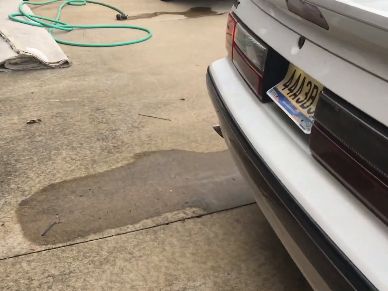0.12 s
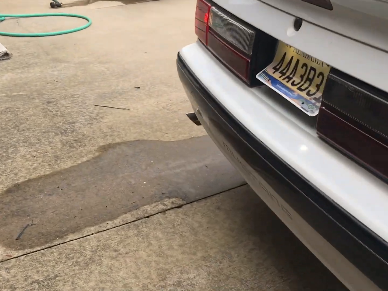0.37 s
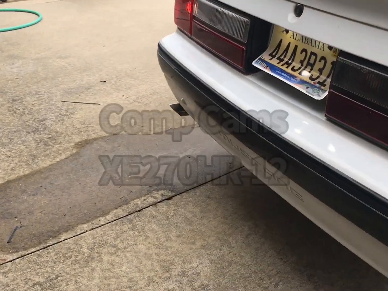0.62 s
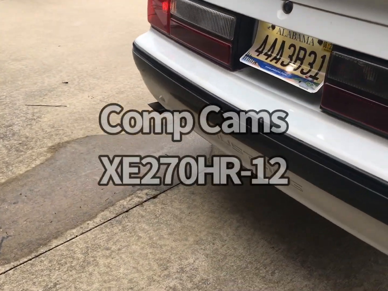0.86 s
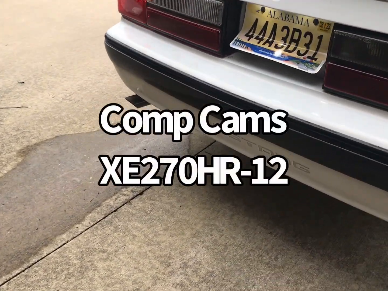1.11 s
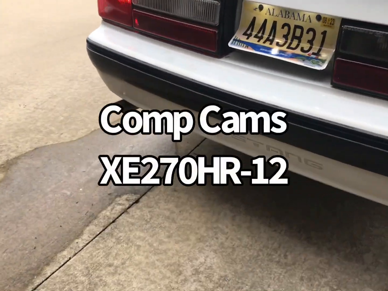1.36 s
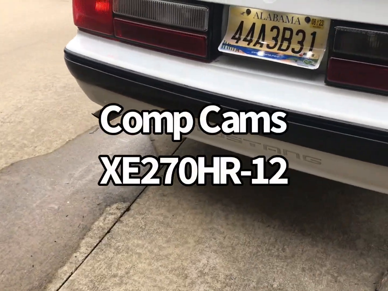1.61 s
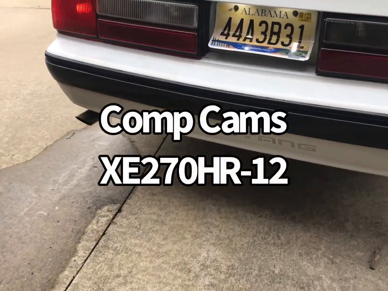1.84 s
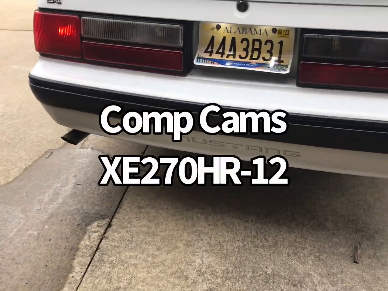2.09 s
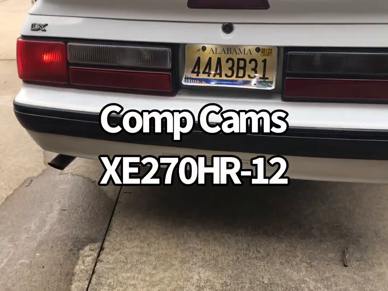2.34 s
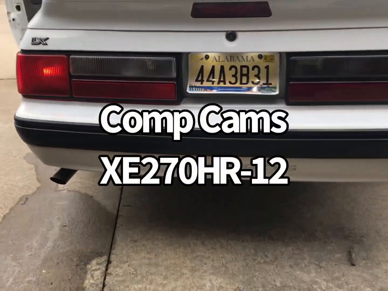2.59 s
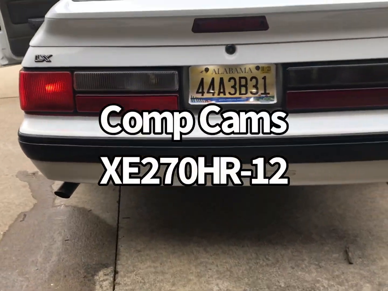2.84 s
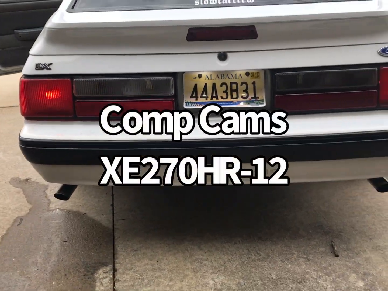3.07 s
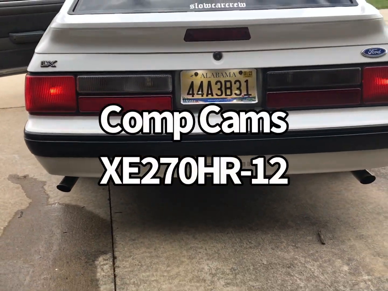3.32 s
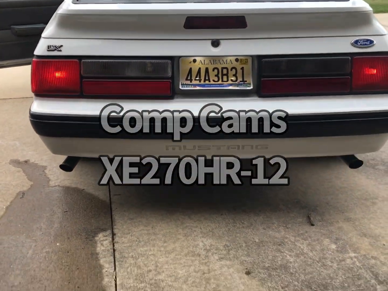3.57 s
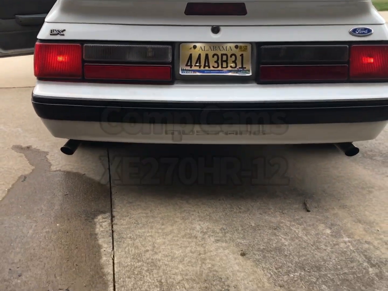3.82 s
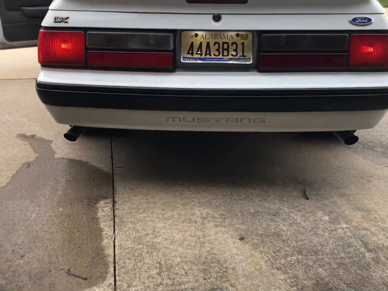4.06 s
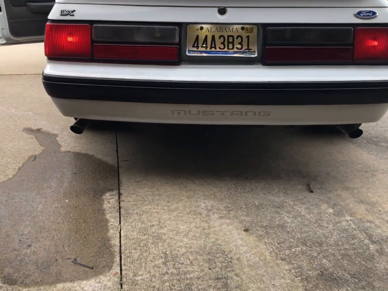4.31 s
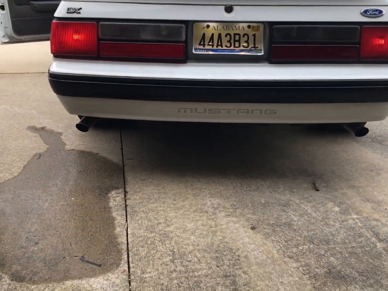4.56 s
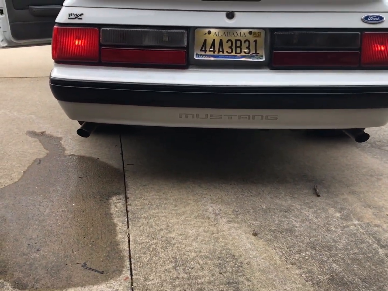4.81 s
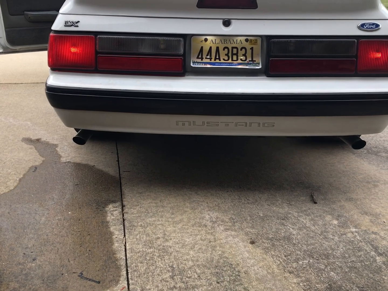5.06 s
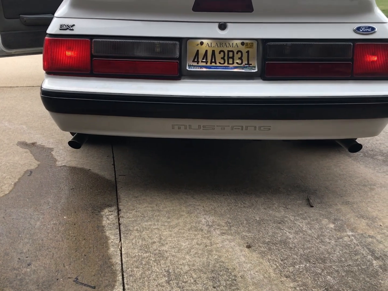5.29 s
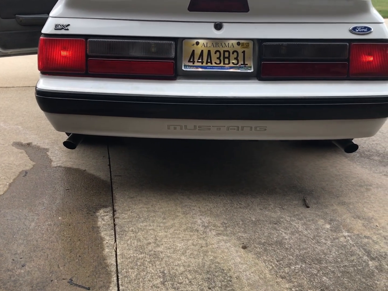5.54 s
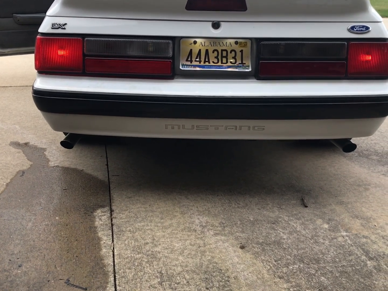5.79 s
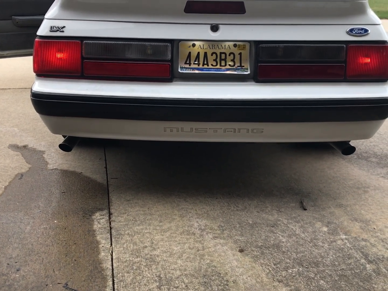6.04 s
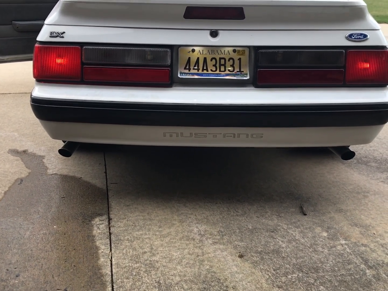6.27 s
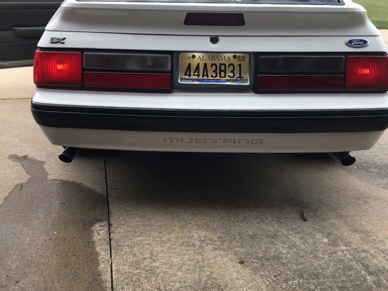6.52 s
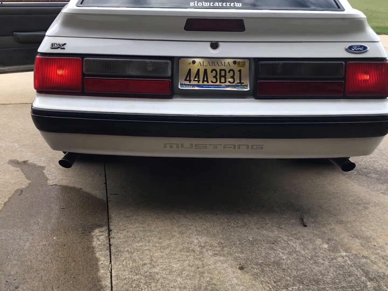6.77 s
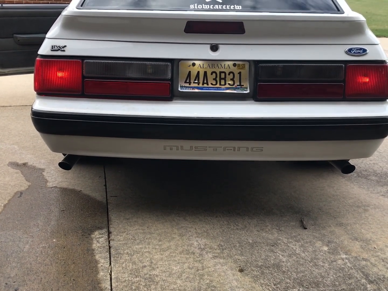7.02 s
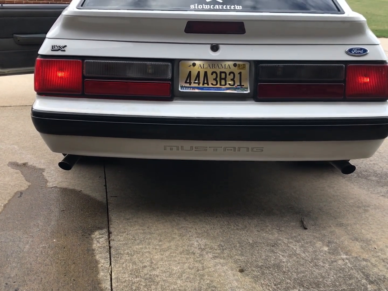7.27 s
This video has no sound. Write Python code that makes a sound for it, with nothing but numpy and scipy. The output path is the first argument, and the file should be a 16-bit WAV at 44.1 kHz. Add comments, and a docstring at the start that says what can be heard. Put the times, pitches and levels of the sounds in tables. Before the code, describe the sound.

Outdoors on concrete, close behind a car, a big V8 idles with a rough, loping burble and irregular airy spits from its tailpipes. Around four seconds the throttle is blipped: a hard bark and roar rises fast, then sinks over a second to a smoother idle. A second blip with metallic pings climbs at the very end and cuts off.

```python
"""A lumpy V8 idles through twin tailpipes over concrete and its throttle is blipped twice.
Even firings sum to harmonic tones, uneven burning rings the pipe modes, and every firing jets gas from a tip.
Under load the tailpipes bark; a steel tip pings faintly at idle and harder in the second blip.
Fan, belts and intake hiss behind, with a tick and squeaks; a ground echo combs rumble, gas and hiss
as the listener walks from the left pipe to the middle behind the car."""
import sys
import numpy as np
from scipy import signal
from scipy.fft import rfft, irfft, next_fast_len
from scipy.io import wavfile
from scipy.ndimage import uniform_filter1d

SR = 44100
rng = np.random.default_rng(int(sys.argv[2]) if len(sys.argv) > 2 else 0)


def store_wav(level_fs):
    """Save 16-bit WAV to argv[1]."""
    pcm = np.round(np.clip(np.atleast_2d(level_fs), -1, 1) * 32767)
    wavfile.write(sys.argv[1], SR, pcm.T.astype(np.int16))


def attenuation_scalar(level_db):
    """Turn a level in dB into a linear amplitude multiplier (20 dB per decade)."""
    decades = np.asarray(level_db, float) / 20
    return 10 ** decades


N = 325796
t = np.arange(N) / SR
# the hardest jets of gas: (time [s], relative peak level [dB])
SPITS = [(0.166, -16), (0.206, -16.5), (0.425, -19), (0.484, -22), (0.7, -16), (0.795, -13), (0.835, -13),
         (0.932, -15), (1.042, -17), (1.097, -11.5), (1.139, -16), (1.236, -14), (1.273, -14.5),
         (1.347, -16.5), (1.405, -17), (1.445, -17), (1.649, -21), (1.821, -14), (1.933, -10.5),
         (2.01, -29), (2.061, -15.5), (2.117, -22), (2.404, -13.5), (2.474, -14.5), (2.529, -14.5),
         (2.58, -21), (2.689, -17.5), (2.757, -16), (2.866, -16.5), (2.969, -14), (3.433, -16.5),
         (3.933, -16), (3.96, -4.5), (4.0145, 1), (4.086, -7), (4.4974, -27), (4.8918, -16), (6.2724, -19),
         (7.135, -12), (7.155, -5), (7.2104, -6.5)]
# random spread of jet strength and of firing knocks [dB]; wavering of octave and undertone [dB]
JET_SCATTER_DB, WAVER_DB = 1.5, 2.5
# the thump in the pipe is under way this long before its jet is heard [s]
THUMP_LEAD_S = 0.0075


def unit(x):
    """Normalisation to unit rms."""
    return x / np.sqrt(np.mean(x ** 2))


def curves(table, x=t):
    """Linear interpolation of each later column of a table against its first."""
    first, *columns = np.transpose(table)
    return [np.interp(x, first, c) for c in columns]


def colour(x, points):
    """Linear-phase filtering: the spectrum is multiplied by a gain through (frequency [Hz], gain [dB]) points."""
    hz, db = np.transpose(points)
    size = next_fast_len(N)
    f = np.arange(size // 2 + 1) * SR / size + 1
    gain = attenuation_scalar(np.interp(np.log(f), np.log(hz), db))
    return irfft(rfft(x, size) * gain, size)[:N]


def band(x, lo_hz, hi_hz, order):
    """Butterworth band-pass filtering."""
    return signal.sosfilt(signal.butter(order, [lo_hz, hi_hz], "band", fs=SR, output="sos"), x)


def band_level(x, lo_hz, hi_hz):
    """Normalisation of the whole signal by the rms of one band."""
    return x / np.sqrt(np.mean(band(x, lo_hz, hi_hz, 4) ** 2))


def decay(x, seconds):
    """Exponential relaxation: a one-pole tail with peak 1 for a unit click."""
    return signal.lfilter([1], [1, -np.exp(-1 / (seconds * SR))], x)


def walk(rate):
    """Slow random modulation: levels held for 1 / rate seconds and slewed, with unit rms."""
    k = int(SR / rate)
    return unit(uniform_filter1d(np.repeat(rng.standard_normal(N // k + 1), k), k)[:N])


def clicks(times, sizes):
    """An impulse train of single-sample clicks."""
    x = np.zeros(N)
    np.add.at(x, np.clip((np.asarray(times) * SR).astype(int), 0, N - 1), sizes)
    return x


def small_sounds():
    """Transients: a dry tick of decaying, differentiated noise, and squeaks that are brief sine bursts."""
    # small dry ticks: (time [s], relative level [dB])
    ticks = [(3.1339, -30)]
    # thin squeaks: (start [s], length [s], frequency [Hz], peak level [dB])
    squeaks = [(7.012, .036, 7800, -43), (7.04, .035, 7800, -51), (1.66, .03, 14500, -58)]
    s, db = np.transpose(ticks)
    grit = np.diff(rng.standard_normal(N + 3), 3) / 4
    out = decay(clicks(s, attenuation_scalar(db + 11.0)), 0.00045) * grit
    for start, length, hz, db in squeaks:
        shape = np.sin(np.pi * np.clip((t - start) / length, 0, 1)) ** 2
        out = out + attenuation_scalar(db) * shape * np.sin(2 * np.pi * hz * t)
    return out


def hiss(wide, swell_db):
    """Broadband turbulence: coloured noise of fan, belts and intake, flickering and swelling with the throttle."""
    # spectrum of the hiss: (frequency [Hz], relative level [dB])
    hiss_colour = [(150, 35), (300, 33), (600, 25), (1300, 16.5), (2500, 14.5), (3500, 9.5), (4500, 6),
                   (7000, 4), (10000, -1), (11000, -5), (13000, -2), (15500, -12)]
    noise = band_level(colour(rng.standard_normal(N), hiss_colour), 5780, 16200)
    # 18.5 dB more at full opening; the hiss takes a share of the gas swells
    hiss_db = -55 + 18.5 * wide + 0.84 * swell_db
    return noise * attenuation_scalar(hiss_db + 1.63 * walk(25.))


def ground(x, lag_ms, share):
    """Comb filtering: the concrete returns a later, duller copy, so the notches move as the lag changes."""
    late = np.interp(t - lag_ms / 1000, t, x)
    echo = signal.sosfilt(signal.butter(1, 6000, fs=SR, output="sos"), late)
    return x + share * echo


def pings():
    """Impulse response of a damped resonator: a hard jet strikes the steel tip and it rings for milliseconds."""
    # strikes on the tip: (time [s], relative level [dB])
    strikes = [(6.15, -33), (6.275, -38), (6.415, -30.5), (6.971, -29), (7.05, -30), (7.09, -20),
               (7.135, -15.5), (7.169, -20), (7.321, -27)]
    ring_hz, width_hz = 3340, 820
    s, db = np.transpose(strikes)
    mode = signal.iirpeak(ring_hz, ring_hz / width_hz, SR)

    def ring(x):
        """Three equal resonators in cascade."""
        for _ in range(3):
            x = signal.lfilter(*mode, x)
        return x
    return ring(clicks(s, attenuation_scalar(db))) / np.abs(ring(clicks([0], 0.76))).max()


def throttle():
    """Superposition of identical blips, giving the opening 0-1."""
    # throttle blips: (time of widest opening [s], opening [0-1])
    blips = [(3.995, 0.93), (7.144, 0.88)]
    # one blip: (time from widest opening [s], share of its opening [0-1])
    blip_shape = [(-.2, 0.02), (-.1, 0.52), (-.06, 0.77), (0, 1), (.08, 0.74), (0.191, 0.47), (.26, 0.02)]
    after, shape = np.transpose(blip_shape)
    return np.clip(sum(size * np.interp(t - s, after, shape) for s, size in blips), 0, None)


def gas_swells():
    """Amplitude modulation: brief triangular swells of the gas noise [dB]."""
    # swells: (time of peak [s], half length [s], rise [dB])
    swells = [(4.54, 0.14, 6.5), (4.907, 0.1, 2.5), (5.537, 0.32, 3), (6.61, 1, 2.5)]
    return sum(db * np.clip(1 - np.abs(t - s) / half, 0, 1) for s, half, db in swells)


def crank(hz):
    """Phase is the integral of rate: firings counted, eased to bring the hardest jets near whole counts."""
    turns = np.cumsum(hz) / SR
    s = np.transpose(SPITS)[0]
    slip = np.unwrap(np.interp(s, t, turns) % 1, period=1)
    return turns - np.interp(t, s, uniform_filter1d(slip, size=3))


def jet_strengths(beat, first_share, lumpy, luck):
    """Periodic modulation: the lope repeats every sixteen firings, and scatters less as speed rises."""
    # first lope pattern, sixteen firings in turn: (level at idle speed [dB])
    first_lope_db = np.array([-4, 3, 0, 6, -7, 7.5, -7, -8, 6, -8, 5.5, -3, -3, -10, 0, 3.5])
    # second lope pattern: (level at idle speed [dB])
    second_lope_db = np.array([-4, -13, 4, -2, 4, 6, -3, -9, 3, 6, -9, 0, -8, -8, 5, 2])
    lope_db = first_share * first_lope_db[beat] + (1 - first_share) * second_lope_db[beat]
    return attenuation_scalar(lope_db + JET_SCATTER_DB * luck) ** lumpy


def burning(times, count, beat, first_share, luck):
    """Cycle-to-cycle variation: a long-overlap camshaft burns each charge differently."""
    # first lope pattern, share of a full charge burnt by sixteen firings in turn: (share [0-1])
    first_charge = np.array([.1, .65, .35, .35, .95, .55, 0, .45, .65, .4, .7, .1, .9, 0, .4, .75])
    # second lope pattern, where many all but misfire: (share [0-1])
    second_charge = np.array([.15, .15, .95, .05, .65, 1, .2, .1, .7, .9, 0, .9, 0, .25, .7, .55])
    # excess of each cylinder over the mean, in firing order: (relative excess [1])
    cylinders = np.array([1, -1.2, 0.2, 1.32, 0.038, -0.25, -0.72, 1.02])
    # make-up of uneven burning: (time [s], weight of the lope [1], of each cylinder [1], of chance [1])
    burn_shares = [(0, .85, .15, .45), (1.4, .85, .15, .45), (1.8, .95, .05, .3), (3.6, .95, .05, .3),
                   (3.9, .2, .7, .65), (5.4, .2, .75, .6), (5.8, .3, .85, .4), (7.39, .3, .85, .4)]
    charge = first_share * first_charge[beat] + (1 - first_share) * second_charge[beat]
    by_lope, by_cylinder, by_chance = curves(burn_shares, times)
    excess = by_lope * unit(charge - charge.mean())
    excess = excess + by_cylinder * unit(cylinders[count % 8])
    return excess + by_chance * unit(luck)


def spit(times, soft, hard_db, bright_db, gas_db, hz, behind, flow):
    """Jet noise: each firing releases turbulence with a quick rise and a tail that shortens with speed."""
    # jet spectrum beside the left pipe: (frequency [Hz], relative level [dB])
    side_colour = [(350, -106), (560, -5.5), (780, 2.2), (1150, -5), (1500, -6.5), (2200, -12),
                   (3400, -9.5), (4300, -28), (7000, -34), (10000, -45), (15500, -48)]
    # jet spectrum from behind: (frequency [Hz], relative level [dB])
    behind_colour = [(350, -11), (520, -6), (760, -4.5), (1100, -1), (1500, -7), (1950, -6.5), (2300, -8.5),
                     (2650, -11), (2900, -15.5), (3500, -7), (4000, -21), (4700, -16), (5300, -25.5),
                     (7000, -28.5), (10000, -38), (15500, -49)]
    rise_turns, tail_turns = 0.09, 0.32  # time constants in firing periods
    luck_db = 2.5
    last = np.clip(np.searchsorted(times, t) - 1, 1, None)

    def puffs(sizes):
        """Superposed envelopes of the two latest puffs."""
        out = 0
        for k in (last, last - 1):
            age_turns = np.maximum(t - times[k], 0) * hz
            out = out + sizes[k] * (1 - np.exp(-age_turns / rise_turns)) * np.exp(-age_turns / tail_turns)
        return out

    tear = rng.standard_normal(N)
    jet = (1 - behind) * colour(tear, side_colour) + behind * colour(tear, behind_colour)
    # no two jets tear alike: every half octave has its own luck at each firing
    noise = 0
    for centre in 560 * 2 ** np.arange(0, 4, .5):
        luck = luck_db * rng.uniform(-1, 1, 1000)[:len(times)]
        luck = luck + bright_db * np.clip(np.log2(centre / 1100), 0, 1)
        part = band(jet, centre / 2 ** .25, centre * 2 ** .25, 2)
        noise = noise + part * uniform_filter1d(attenuation_scalar(luck)[last], size=40)
    noise = noise + signal.sosfilt(signal.butter(2, 7500, "high", fs=SR, output="sos"), jet)
    # the roar of a jet is dense: compression steadies its loudness from one millisecond to the next
    noise = noise / (uniform_filter1d(noise ** 2, size=150) + 1e-12) ** .3
    noise = band_level(noise, 600, 4000)
    every = puffs(soft)
    every = every / np.sqrt(uniform_filter1d(every ** 2, size=SR // 2) + 1e-12) + flow
    return noise * np.maximum(attenuation_scalar(gas_db - 5.0) * every, puffs(attenuation_scalar(hard_db - 6.0)))


def bark(times, sizes, opening):
    """Forced resonance: with the throttle open, knocks and rushing gas ring the tailpipes briefly."""
    mode_hz, width_hz, full_db = 427, 296, -27.5
    mode = signal.iirpeak(mode_hz, mode_hz / width_hz, SR)
    blows = clicks(times, sizes)
    rush = decay(blows, .003) * rng.standard_normal(N)
    knock = unit(blows) + 0.9 * unit(rush)
    return attenuation_scalar(full_db) * opening * unit(signal.lfilter(*mode, signal.lfilter(*mode, knock)))


def rumble(times, excess, speed, groups_db):
    """Modal excitation: departures from the mean firing, and swirling gas, ring the pipe at its resonances."""
    # pipe modes: (frequency [Hz], width [Hz], relative level at idle speed [dB])
    pipe_modes = [(67.3, 31.6, -1.5), (102.6, 18.4, -1.4), (140.4, 28, 0), (205.4, 22.5, -12.5),
                  (269.6, 12, -9.5), (338.7, 61, -20), (393.5, 24, -14.5), (457, 17, -28.5), (511, 29, -46),
                  (611, 49, -24.5), (702.6, 54, -20), (1068, 5.8, -24.5), (1317, 18.4, -32),
                  (1885, 55, -47)]
    swirl_db = -11.5  # noise against the blows
    tilt_db = 3.5  # per octave of mode frequency and octave of speed
    blows = unit(clicks(times, excess - uniform_filter1d(excess, size=16)))
    blows = blows + attenuation_scalar(swirl_db) * rng.standard_normal(N)
    out = 0
    for k, (hz, width, db) in enumerate(pipe_modes):
        mode = signal.iirpeak(hz, hz / width, SR)
        # twice through each mode keeps the valleys dark
        ringing = signal.lfilter(*mode, signal.lfilter(*mode, blows))
        group_db = (0, *groups_db)[np.searchsorted([170, 300, 450], hz)]
        # speed wakes the upper modes
        mode_db = db + tilt_db * np.log2(hz / pipe_modes[0][0]) * speed + group_db
        # neighbours swing opposite
        out = out + (-1) ** k * attenuation_scalar(mode_db) * ringing
    return unit(out)


def undertone(turns, hz):
    """A subharmonic: the three-quarter order of the firing rate, heard while the revs are above idle."""
    # undertone: (firing rate [Hz], mean rms level [dB])
    undertone_levels = [(65, -48), (85, -34), (110, -33), (135, -31), (148, -51)]
    db = curves(undertone_levels, hz)[0] + WAVER_DB * walk(7.3)
    return np.sqrt(2) * attenuation_scalar(db) * np.cos(3 * np.pi * turns / 2)


def tones(turns, hz, first_db, opening, wide):
    """Fourier synthesis: even firings sum to three orders of the firing rate, shifted in phase by the pipe."""
    # throttle shut: (firing rate [Hz], mean octave rms level [dB], third order relative to octave [dB])
    shut_orders = [(50, -19, -26), (56, -22, -22), (60, -26, -11), (64, -24, -11), (72, -30, -12),
                   (90, -37, -12), (140, -41.5, -8)]
    # the pipe shifts each order, and swells the octave as it crosses the third mode under load: (firing rate [Hz],
    # lead of first order [rad], of second [rad], of third [rad], octave gain at full opening [dB])
    through_pipe = [(50, 1.7, 2.5, 4, 0), (56, 1.7, 2.7, 4.3, 0), (62, 1.7, 4, 5.9, 9),
                    (75, 1.7, 3.4, 5.9, 14), (86, 1.7, 3, 5.9, 3), (100, 1.7, 4.7, 5.9, -4),
                    (140, 1.7, 7.5, 5.9, 0)]
    octave_db, third_db = curves(shut_orders, hz)
    *lead, swell_octave_db = curves(through_pipe, hz)
    # a full opening adds 19 dB to the octave and lowers the third order against it
    second_db = octave_db + (19 + swell_octave_db) * opening
    second_db = second_db + WAVER_DB * (1 - wide) * walk(8.)
    third_db = third_db - 12.5 * opening
    ahead = np.interp(t + THUMP_LEAD_S, t, turns)
    first, second, third = (np.cos(2 * np.pi * (k + 1) * ahead + a) for k, a in enumerate(lead))
    return np.sqrt(2) * (attenuation_scalar(first_db) * first + attenuation_scalar(second_db) * (second + attenuation_scalar(third_db) * third))


def scene():
    """Superposition: one firing sequence over eight cylinders drives every exhaust sound, beside the hiss."""
    # engine: (time [s], firing rate before easing [Hz], firing tone rms level [dB])
    engine = [(0.0, 50.62, -13.5), (0.4, 49.66, -18.5), (1.1, 51.95, -16.5), (1.7, 52.26, -20),
              (2.2, 54.73, -18), (2.9, 56.94, -15.5), (3.35, 55.77, -17), (3.61, 52.08, -18),
              (3.82, 54.76, -13.5), (3.91, 72.47, -9.5), (4.03, 100.8, -6), (4.1, 126.3, -11.5),
              (4.2, 145.1, -9.5), (4.31, 148.1, -18), (4.5, 134.4, -19), (4.72, 115.4, -24.5),
              (4.86, 104.6, -19), (5.12, 90.08, -21), (5.3, 80.61, -24.5), (5.51, 66.8, -20),
              (5.7, 62.7, -15), (6.03, 60.22, -16.5), (6.24, 63.31, -12), (6.5, 65.12, -15),
              (6.8, 64.27, -15.5), (6.89, 61.4, -22), (6.99, 62.88, -12.5), (7.08, 77.53, -9.5),
              (7.15, 94, -5), (7.29, 135.6, -13), (7.39, 143.8, -11.5)]
    # lope and listener: (time [s], share of the first lope pattern [0-1], extra path over the ground [ms],
    # relative pipe rumble [dB], relative gas spit [dB], modes 170-300 Hz [dB], modes 300-450 Hz [dB],
    # modes above 450 Hz [dB], tips heard from behind [0-1])
    lope_and_place = [(0, 0.83, 1.26, -15, -35.5, 9, -9.5, -0.5, 0),
                      (1.0, 0.97, 1.04, -14, -32, 1, 2, -1, 0), (0.5, 1, 1.12, -11, -31.5, 5.5, 0, 2, 0),
                      (1.45, 0.76, 1.01, -14, -34.5, 3.5, -4.5, -9, 0.1),
                      (1.8, 0.01, 0.9, -13, -33.5, 3, -8, 4, 0.03),
                      (2.3, 0.01, 0.83, -15.5, -32, -1, -1, -0.5, 0.12),
                      (2.8, 0.12, 0.75, -15, -32.5, 0.5, 3.5, 3.5, 0.13),
                      (3.3, 0.04, 0.64, -18, -36, 0.5, 1, 4, 0.07),
                      (3.7, 0, 0.58, -16.5, -38, 6, -4, 0, 0.6),
                      (4.0, 0.5, 0.565, -15, -42.5, 2.5, -0.5, -2.5, 1),
                      (4.6, 0, 0.57, -23, -42, 1.5, 1.5, -3, 1),
                      (5.5, 0.36, 0.57, -17, -47.5, -3, -3, -2.5, 0.5),
                      (5.9, 0.05, 0.58, -18.5, -50.5, -5.5, -1.5, 4.5, 0.4),
                      (6.3, 0, 0.55, -14, -42, -5, -1, 2.5, 0.3),
                      (6.85, 0.3, 0.57, -16.5, -44.5, -5.5, 0.5, 2, 0.6),
                      (7.39, 0.4, 0.58, -19, -43, 8, 6.5, 4, 1)]
    idle_hz = 55
    hz, first_db = curves(engine)
    first_lope, lag_ms, rumble_db, spit_db, *groups_db, behind = curves(lope_and_place)
    opening, speed = throttle(), np.log2(hz / idle_hz)
    wide = opening ** 3.4  # stays small until the throttle is nearly open
    swell_db = gas_swells()

    turns = crank(hz)
    count = np.arange(1, int(turns[-1]))
    times = np.interp(count, np.maximum.accumulate(turns), t)
    chance = rng.uniform(-1, 1, (1000, 3))[count].T
    first_share = np.clip(np.interp(times, t, first_lope), 0, 1)
    # jets scatter most at idle and even out with speed
    lumpy = (idle_hz / np.interp(times, t, hz)) ** 1.5
    s, db = np.transpose(SPITS)
    hard = np.abs(times[:, None] - s).argmin(axis=0)
    # the first hard jet is at place 8 in the lope of sixteen firings
    beat = (count - count[hard[0]] + 8) % 16
    excess = burning(times, count, beat, first_share, chance[0])
    soft = jet_strengths(beat, first_share, lumpy, chance[1])
    # the firings nearest the hard jets take their times and levels
    times[hard] = s
    hard_db = np.full(len(times), -np.inf)
    hard_db[hard] = db
    times = np.maximum.accumulate(times)

    low = tones(turns, hz, first_db, opening, wide) + undertone(turns, hz)
    # burning evens out by 7 dB per octave of speed and roughens by 8 dB at full opening
    uneven_db = rumble_db - 4 - 7 * speed + 8 * wide
    pipe = attenuation_scalar(uneven_db) * rumble(times - THUMP_LEAD_S, excess, speed, groups_db)
    gas_db = spit_db + 24 * opening + swell_db
    gas = spit(times, soft, hard_db, 2.5 * chance[2], gas_db, hz, np.clip(behind, 0, 1),
               flow=0.23 + 0.4 * opening)
    knocks = bark(times, attenuation_scalar(JET_SCATTER_DB * chance[0]), opening)
    airy = ground(gas + hiss(wide, swell_db), lag_ms, 0.26)
    mix = low + knocks + ground(pipe, lag_ms, 0.82) + airy + pings() + small_sounds()
    return mix[None]


def top_cut(x):
    """Nothing passes above the cut-off."""
    return signal.sosfilt(signal.butter(12, 15720, fs=SR, output="sos"), x)


def record(dry):
    """High-pass filtering and saturation: the microphone drops the deepest bass and rounds the loudest peaks."""
    x = signal.sosfilt(signal.butter(4, 46.2, "high", fs=SR, output="sos"), dry)
    x = np.clip(x / (1 + np.abs(x / 1.01) ** 6) ** (1 / 6), -1, 1)
    return top_cut(x)


dry = scene()
out = record(dry)
store_wav(out)
```